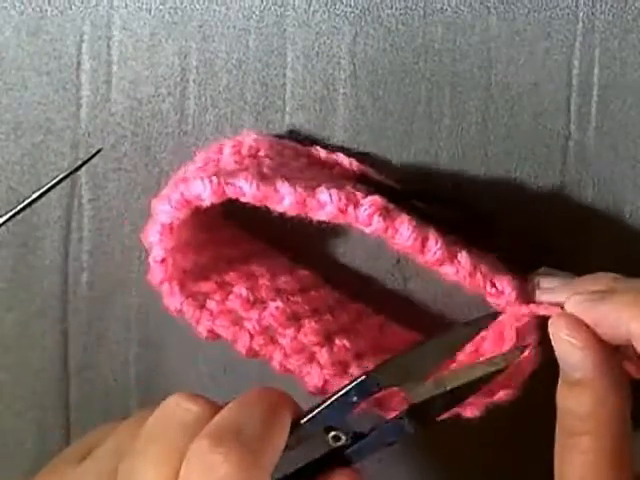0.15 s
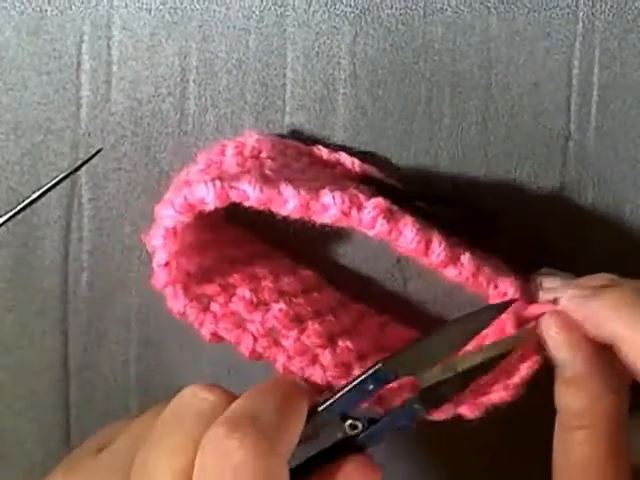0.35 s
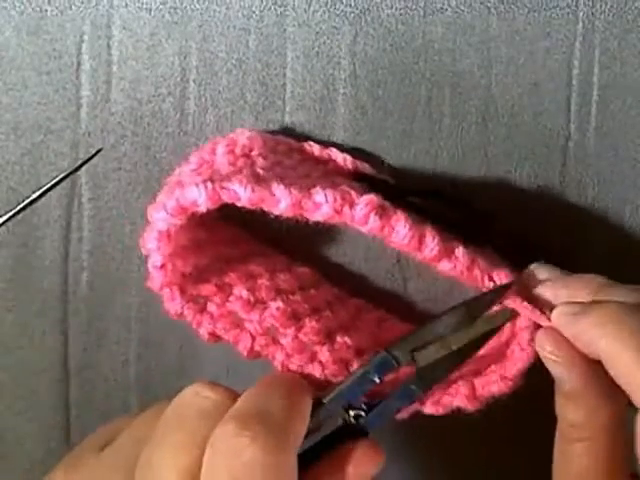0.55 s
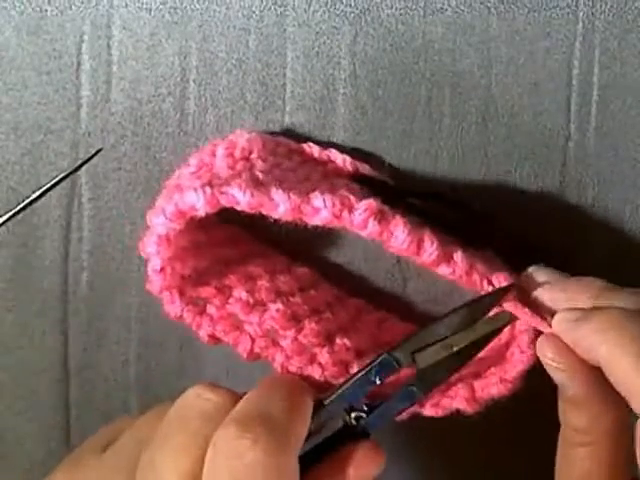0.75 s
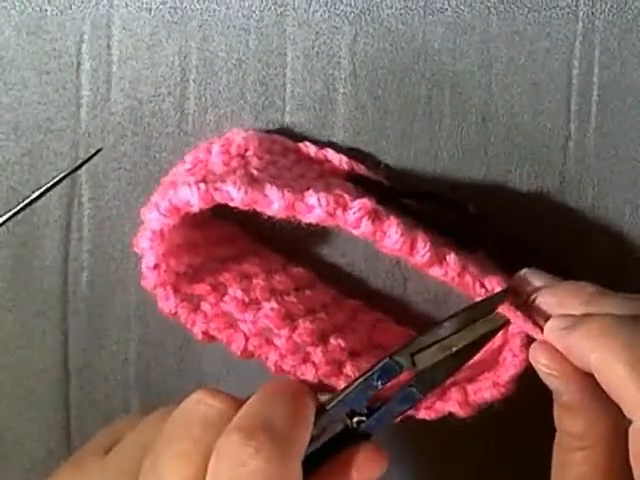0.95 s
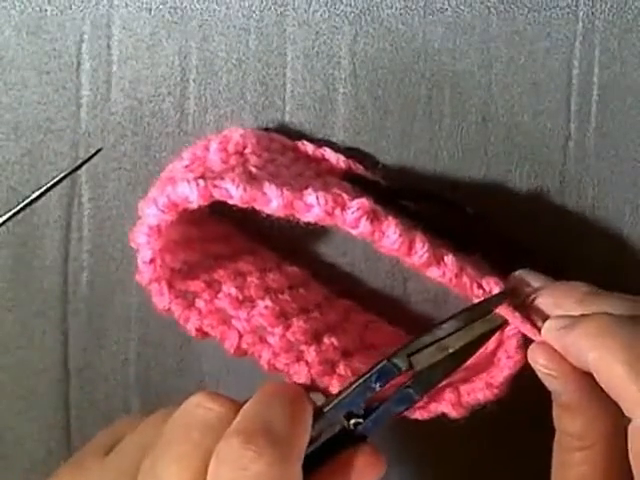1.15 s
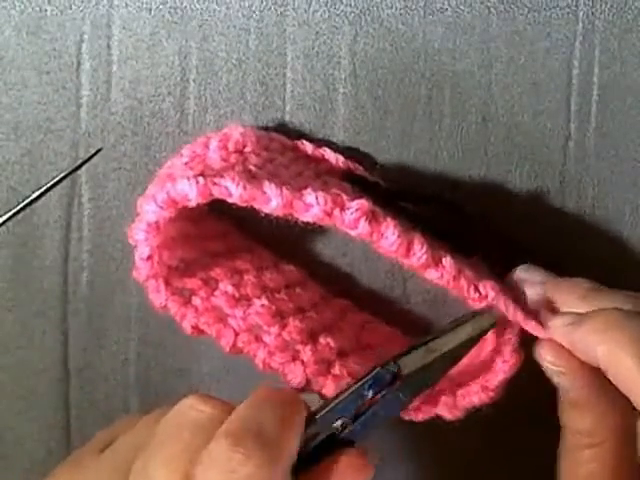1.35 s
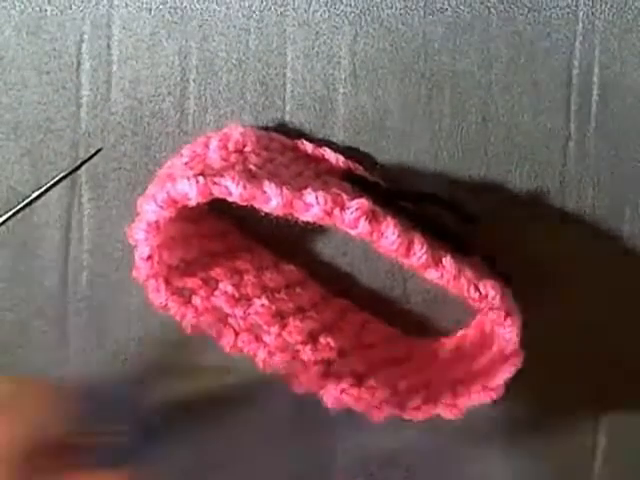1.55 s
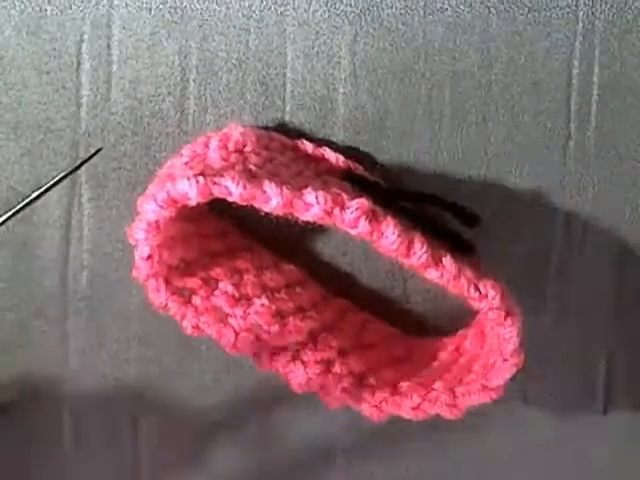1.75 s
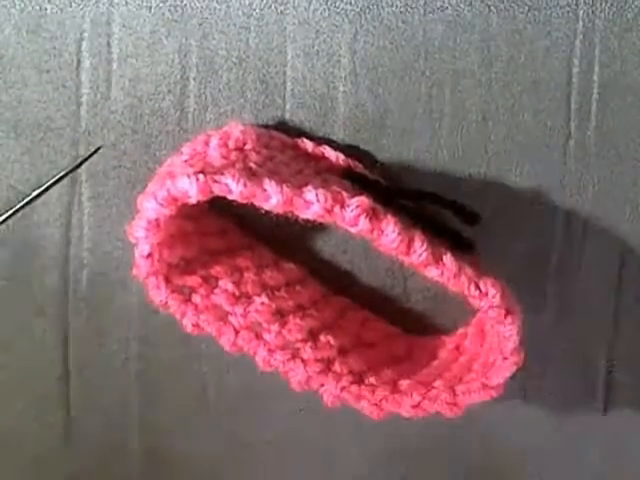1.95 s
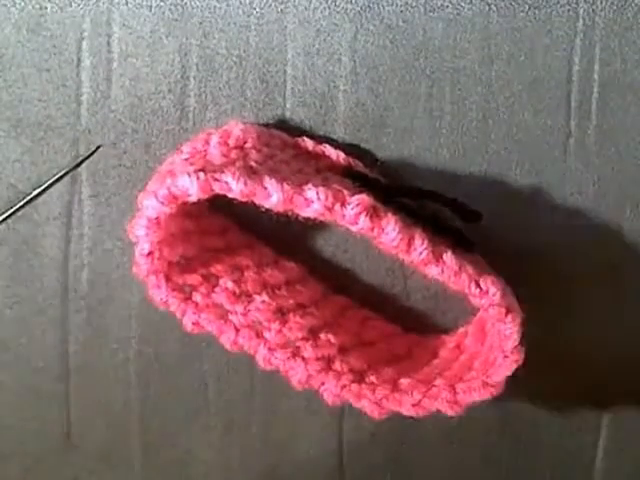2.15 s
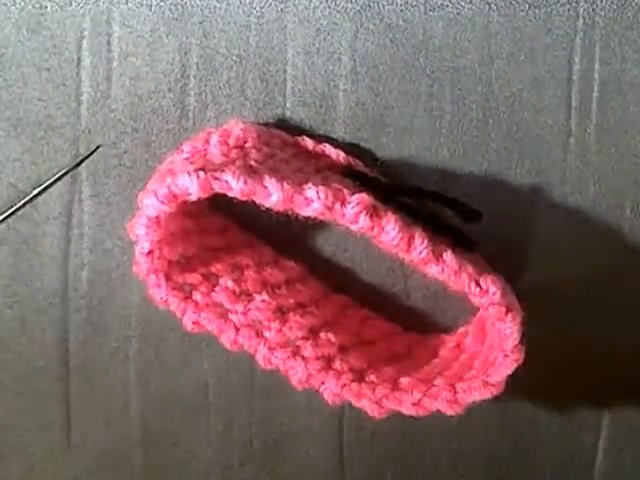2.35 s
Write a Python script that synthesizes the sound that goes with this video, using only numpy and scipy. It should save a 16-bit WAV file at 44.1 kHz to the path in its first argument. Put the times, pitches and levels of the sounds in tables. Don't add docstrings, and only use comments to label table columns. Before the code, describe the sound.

One crisp, bright scissor snip through yarn close up, then a soft opening click, quiet room.

```python
import sys
import numpy as np
from scipy import signal
from scipy.io import wavfile
from scipy.ndimage import uniform_filter1d

SR = 44100
rng = np.random.default_rng(int(sys.argv[2]) if len(sys.argv) > 2 else 0)


def decibels_to_gain(level_db):
    exponent = np.asarray(level_db, float) / 20
    return 10 ** exponent


def store_wav(level_fs):
    pcm = np.round(np.clip(np.atleast_2d(level_fs), -1, 1) * 32767)
    wavfile.write(sys.argv[1], SR, pcm.T.astype(np.int16))


N = 105751

# frequency in Hz, density in dB per Hz.
AIR_COLOUR = [(25, -34), (80, -10.5), (200, -8), (700, -11), (2500, -15), (3400, -23), (5200, -23),
              (15000, -45.5)]
# frequency in Hz, side over mid in dB.
AIR_WIDTH = [(60, -2.5), (180, -11.5), (550, -10), (1650, -22), (4970, -42), (15000, -10)]
# frequency in Hz, width in Hz, level in dB.
APPLIANCES = [(61, 23, -89), (260, 21, -78.5), (675, 30, -82.5), (1220, 400, -74), (2400, 200, -77.5),
              (4870, 770, -79)]
# start in seconds, peak in dB.
LOW_KNOCKS = [
    (0.567, -58),
    (0.941, -66),
    (1.177, -62),
    (1.3, -64),
    (1.597, -61.5),
    (1.985, -61),
    (2.072, -61.5),
    (2.146, -66.5),
    (2.225, -68),
    (2.378, -58.5),
]
# start in seconds, peak in dB.
HIGH_KNOCKS = [
    (0.029, -65.5),
    (0.149, -63.5),
    (0.833, -64.5),
    (1.329, -67.5),
    (1.489, -63.5),
    (2.044, -62.5),
    (2.122, -65.5),
]
# time in seconds, rub strength in dB.
SHEAR = [
    (1.25, -79),
    (1.33, -65.5),
    (1.365, -62),
    (1.378, -61),
    (1.39, -49.5),
    (1.393, -55),
    (1.396, -36.5),
    (1.401, -26.5),
]
# time in seconds, peak in dB.
FIBRES = [(1.2597, -60), (1.2794, -57.5), (1.296, -60), (1.3087, -52), (1.3131, -49.5), (1.325, -61),
          (1.3349, -48.5), (1.3434, -54), (1.3544, -55.5), (1.368, -37.5), (1.3715, -39.5), (1.3745, -39),
          (1.3828, -40), (1.3895, -27)]
# time in seconds, rub strength in dB.
CLOSING = [
    (1.384, -61),
    (1.39, -51.5),
    (1.397, -43),
    (1.4, -23.5),
    (1.4045, -16),
    (1.409, -18),
    (1.412, -27.5),
    (1.4205, -27),
    (1.422, -45),
]
# time in seconds, click peak in dB, handle thud in dB.
SNAPS = [
    (1.405, -4, -11.5),
    (1.4057, -7, -38),
    (1.406, -7, -30),
    (1.4071, -8, -27.5),
    (1.4079, -12.5, -24),
    (1.4097, -14.5, -43.5),
    (1.4129, -19, -42),
    (1.4195, -16.5, -51.5),
    (1.5978, -62, -60.5),
]
# time in seconds, rub strength in dB.
OPENING = [
    (1.585, -61),
    (1.59, -44),
    (1.595, -49),
    (1.597, -33.5),
    (1.6015, -31),
    (1.6035, -38),
    (1.605, -46),
    (1.628, -51.5),
    (1.653, -70),
]
# time in seconds, peak in dB.
SLIPS = [
    (1.5955, -39.5),
    (1.5982, -39),
    (1.5998, -34),
    (1.6014, -31.5),
    (1.6028, -36),
    (1.6064, -40),
    (1.6093, -59),
]
# frequency in Hz, level shut in dB, level opening in dB, t60 in seconds.
BLADE_MODES = [(2600, -12.5, -38, .008), (2930, -8.5, -42, .012), (3260, -8, -18, .008),
               (4290, -13.5, -24, 0.01), (4873, -12, -2.5, 0.01), (5580, 0.5, 2, 0.011),
               (6130, -3.5, -0.5, 0.01), (6740, -9.5, 1, 0.0063), (7590, -8, -0.5, 0.0056),
               (8370, 2.5, -7, 0.0068), (8770, -3.5, -13, 0.005), (9430, -0.5, -10.5, .009),
               (11300, -6, -4, 0.003), (13760, -5.5, -25, .004)]
# frequency in Hz, side over mid in dB.
BLADE_WIDTH = [(2300, -7.5), (4400, -10.5), (8000, -14), (14000, -10)]
# frequency in Hz, t60 in seconds.
ROOM_T60 = [(2300, 0.06), (3000, 0.14), (4500, 0.15), (6000, .29), (9000, 0.23), (11000, 0.17),
            (14000, 0.15)]
# frequency in Hz, level in dB, t60 in seconds, left over right in dB,
# lead in seconds between the capsules.
HANDLE_MODES = [(300, -12.5, 0.0054, -5, .0001), (502.1, -2, 0.0061, -11, 0.00023),
                (670, -9, .006, -7, .0004), (900, -8.5, 0.008, -1.5, .0003), (1160, -6, 0.013, -6, .00012),
                (1450, -12, 0.014, 0, 0.00014), (1920, -13, 0.012, -2, 0.000088),
                (2220, -10, .012, -4, .00006)]
LEFT_RIGHT = np.array([[1], [-1]])


def rms_one(x):
    return x / np.sqrt(np.mean(x ** 2) + 1e-20)


def at_hz(points, hz):
    f, value = np.transpose(points)
    return np.interp(np.log(hz), np.log(f), value)


def band(x, order, low_hz, high_hz):
    return signal.sosfilt(signal.butter(order, [low_hz, high_hz], "band", fs=SR, output="sos"), x)


def low_cut(x, hz):
    return signal.sosfilt(signal.butter(2, hz, "high", fs=SR, output="sos"), x)


def steep_cut(x, hz):
    return signal.sosfilt(signal.ellip(10, .5, 60, hz, fs=SR, output="sos"), x)


def stereo(mid, side):
    return np.array([mid + side, mid - side])


def drift(rate_hz):
    r = np.exp(-80 * np.pi * rate_hz / SR)
    slow = signal.lfilter([1], [1, -2 * r, r * r], rng.standard_normal(N // 40 + 2002))[2000:]
    return np.interp(np.arange(N) / 40, np.arange(len(slow)), rms_one(slow))


def ring(clicks, hz, t60):
    r, w = decibels_to_gain(-60 / (t60 * SR)), 2 * np.pi * hz / SR
    return signal.lfilter([0, np.sin(w)], [1, -2 * r * np.cos(w), r * r], clicks + 1e-18)


def clicks_at(seconds, db):
    out = np.zeros(N)
    np.add.at(out, (np.asarray(seconds) * SR).astype(int), decibels_to_gain(db))
    return out


def rubbing(curve):
    rubs_per_s, spread_db = 6000, 3
    s, db = np.transpose(curve)
    level = decibels_to_gain(np.interp(np.arange(N) / SR, s, db, left=-200, right=-200))
    sizes = decibels_to_gain(spread_db * np.minimum(rng.exponential(1, N), 3)) * rng.choice([-1, 1], N)
    return 0.2 * level * sizes * (rng.random(N) < rubs_per_s / SR)


def third_octaves():
    white = rng.standard_normal((2, 2, N))
    edges = 22 * 2 ** np.arange(0, 9.7, 1 / 3)
    for k, (low, high) in enumerate(zip(edges, edges[1:])):
        yield np.sqrt(low * high), band(white[k % 2], 2, low, high)


def room_air():
    level_db, patchy_db = -66.5, 2.37
    out, together = 0, drift(4.6)
    for hz, (mid, side) in third_octaves():
        gain = decibels_to_gain(at_hz(AIR_COLOUR, hz) + patchy_db * (0.5 * together + drift(23)))
        out = out + gain * stereo(mid, side * decibels_to_gain(at_hz(AIR_WIDTH, hz)))
    out = decibels_to_gain(level_db) * rms_one(out)
    for hz, width_hz, db in APPLIANCES:
        mid, side = ring(rng.standard_normal((2, N)), hz, 2.2 / width_hz)
        out = out + decibels_to_gain(db) * stereo(rms_one(mid), rms_one(side) * decibels_to_gain(at_hz(AIR_WIDTH, hz)))
    return steep_cut(out, 13200)


def mains_hum():
    hz = 120.1 + 5.5 * drift(8.3)
    return decibels_to_gain(-72.5 + 2.5 * drift(3.4)) * np.sin(2 * np.pi * np.cumsum(hz) / SR)


def table_knocks():
    rise_s, level_db, pan_db = 0.0042, 2, 1.4
    out, t = 0, np.arange(N) / SR
    for rows, hz in ((LOW_KNOCKS, 274.7 * 1.02), (HIGH_KNOCKS, 656 * 1.02)):
        for s, db in rows:
            age = np.clip((t - s) / rise_s, 0, 60)
            swell = age ** 2 * np.exp(2 - age) / 4
            tone = swell * np.sin(2 * np.pi * hz * (t - s))
            out = out + decibels_to_gain(db + level_db + pan_db * LEFT_RIGHT) * tone
    return out


def yarn_dulling_db(hz):
    return -36 * abs(np.log2(hz / 6100))


def struck(rows, extra_db):
    s, db = np.transpose(rows)[:2]
    return clicks_at(s, db - 9 + extra_db + 2.5 * rng.standard_normal(len(s)))


def fibre_ticks(hz, shut_db, t60):
    clicks = decibels_to_gain(shut_db + 4.5) * struck(FIBRES, yarn_dulling_db(hz))
    return band(ring(clicks, hz, t60 * 0.54), 3, 4990, 7300)


def opening_push():
    rub = rubbing(OPENING)
    return rub, band(rub + clicks_at(*np.transpose(SLIPS)), 4, 3600, 13500)


def scrape(closing, thin):
    s, db, _ = np.transpose(SNAPS)
    return decibels_to_gain(-0.5) * band(closing + decibels_to_gain(-9) * thin + 0.25 * clicks_at(s, db), 1, 2180, 11000)


def snips():
    yarn, closing = rubbing(SHEAR), rubbing(CLOSING)
    opening, thin = opening_push()
    mid = scrape(closing, thin)
    side = decibels_to_gain(-12.5) * np.roll(mid, 9)
    mid = mid + decibels_to_gain(-24.5) * (ring(opening, 1220, 0.016) + ring(opening, 2800, 0.0039))
    room, white = 0, rng.standard_normal((2, 2, N))
    for k, (hz, shut_db, open_db, t60) in enumerate(BLADE_MODES):
        shut_push = struck(SNAPS, 0) + closing + decibels_to_gain(yarn_dulling_db(hz)) * yarn
        push = decibels_to_gain(shut_db) * shut_push + decibels_to_gain(open_db) * thin
        mode = ring(push, hz, t60) * (-1) ** k + fibre_ticks(hz, shut_db, t60)
        mid = mid + mode
        side = side + np.roll(mode, 2) * decibels_to_gain(at_hz(BLADE_WIDTH, hz)) * (-1) ** (k // 2)
        room = room + gate(reflections(mode, hz, t60, white[k % 2]))
    return stereo(mid, side) + steep_cut(band(room, 3, 2450, 11000), 14500)


def reflections(mode, hz, t60, white):
    rise_s, wall_lag_s, early_db, level_db = 0.0012, 0.017, -10, -15
    opening = np.arange(N) > 1.58 * SR
    shade = decibels_to_gain(2 * -7 * opening)
    slow, rise = decibels_to_gain(-120 / (at_hz(ROOM_T60, hz) * SR)), np.exp(-1 / (rise_s * SR))
    stored = signal.lfilter([(1 - slow) * (1 - rise)], np.convolve([1, -slow], [1, -rise]),
                            mode ** 2 * shade + 1e-18)
    stored = decibels_to_gain(early_db) * stored + np.roll(stored, int(wall_lag_s * SR))
    mid, side = ring(white, hz, t60 * 0.8)
    level = decibels_to_gain(level_db + 2.5 * drift(40)) * np.sqrt(stored.clip(0))
    return level * stereo(rms_one(mid), rms_one(side) * decibels_to_gain(-12))


def gate(x):
    threshold_db, steepness, window_s = -57, 1.8, 0.013
    power = uniform_filter1d(np.mean(x ** 2, axis=0), size=int(window_s * SR))
    level_db = 10 * np.log10(power.clip(1e-16))
    return x * decibels_to_gain(steepness * np.minimum(level_db - threshold_db, 0))


def handles():
    s, _, db = np.transpose(SNAPS)
    s = s + 0.0001
    push, thud = clicks_at(s, db), 0
    for hz, level_db, t60, pan_db, lead_s in HANDLE_MODES:
        both = np.array([push, clicks_at(s + lead_s, db)])
        thud = thud + ring(both, hz, t60) * decibels_to_gain(level_db + pan_db / 2 * LEFT_RIGHT)
    shove = decibels_to_gain(-15) * ring(push, 60, 0.025) * LEFT_RIGHT
    return low_cut(thud, 300) + shove


def scene():
    floor = (room_air() + mains_hum()) * decibels_to_gain(0.92 / 2 * LEFT_RIGHT)
    return floor + table_knocks() + snips() + handles()


def band_limit(x):
    return signal.sosfilt(signal.butter(12, 15750, fs=SR, output="sos"), x)


def record(dry):
    top = 0.94
    x = top * np.tanh(low_cut(dry, 48) / top)
    x = signal.sosfilt(signal.ellip(12, .5, 75, 15700, fs=SR, output="sos"), x)
    return band_limit(x)


dry = scene()
out = record(dry)
store_wav(out)
```